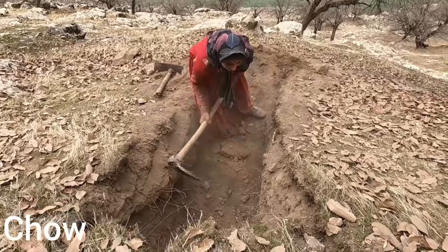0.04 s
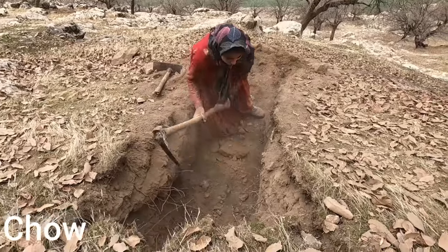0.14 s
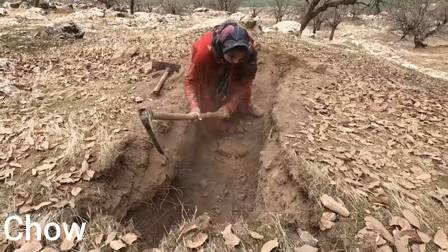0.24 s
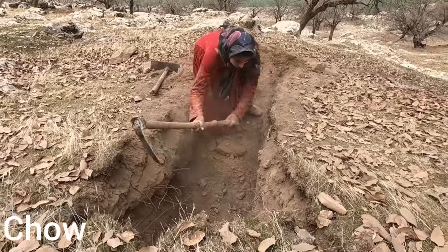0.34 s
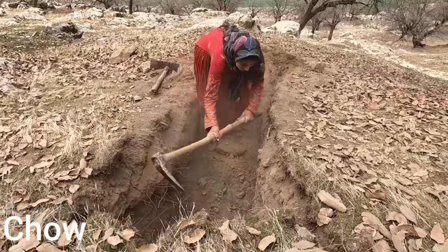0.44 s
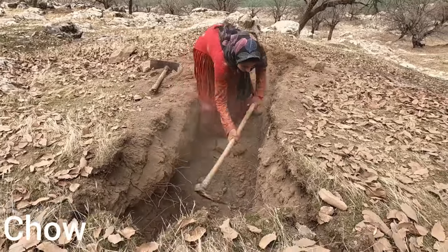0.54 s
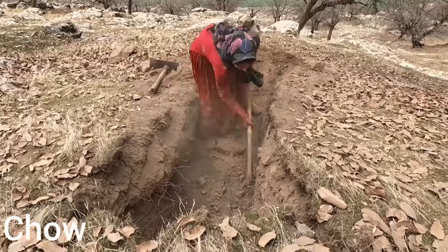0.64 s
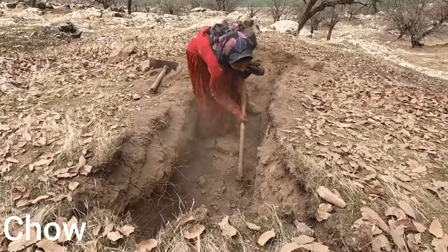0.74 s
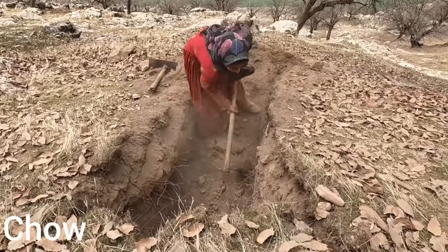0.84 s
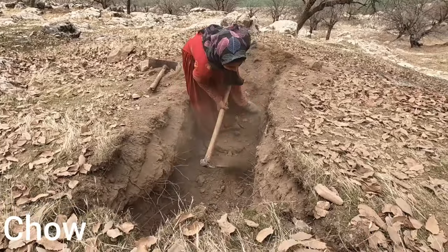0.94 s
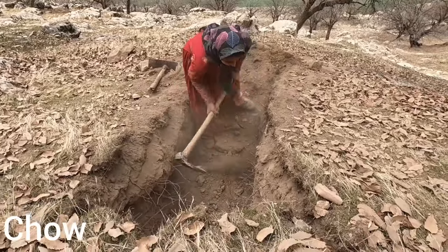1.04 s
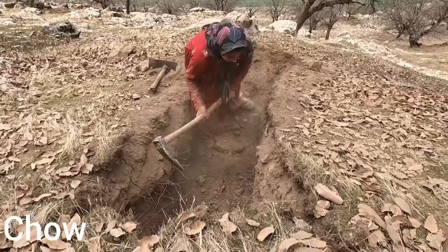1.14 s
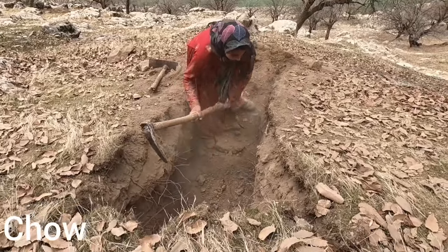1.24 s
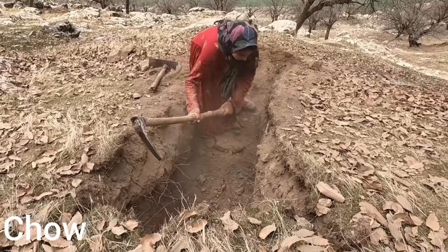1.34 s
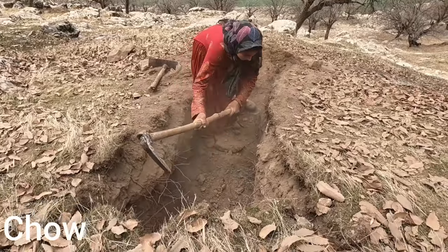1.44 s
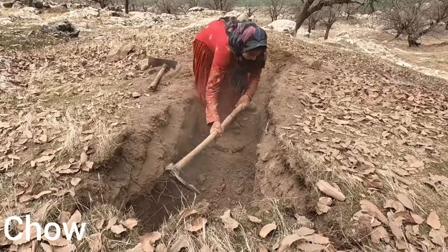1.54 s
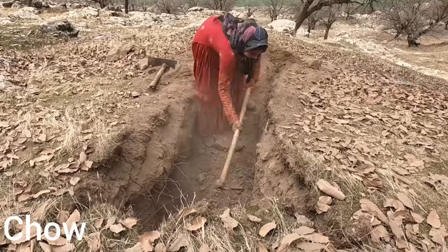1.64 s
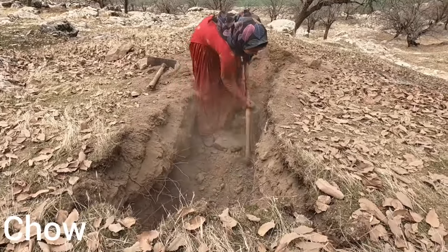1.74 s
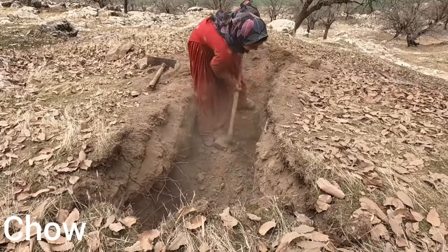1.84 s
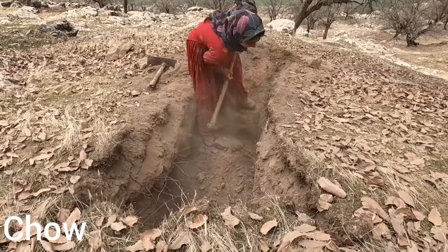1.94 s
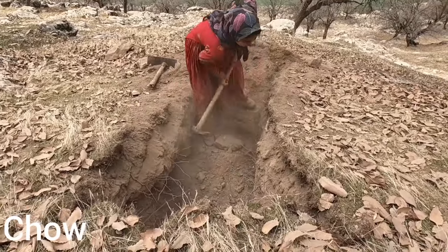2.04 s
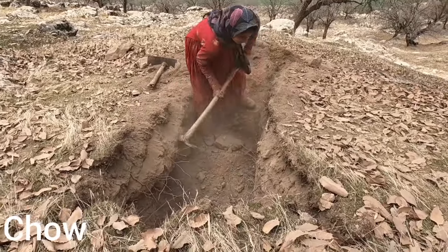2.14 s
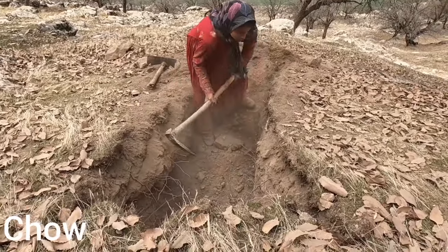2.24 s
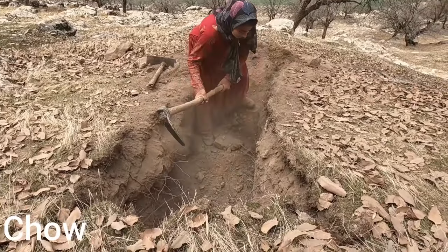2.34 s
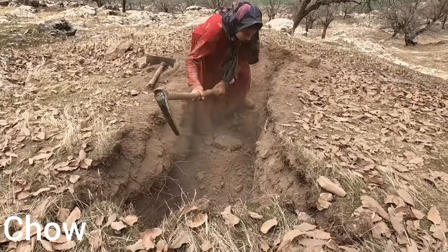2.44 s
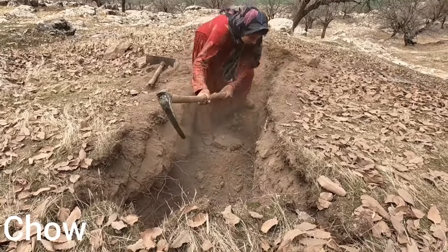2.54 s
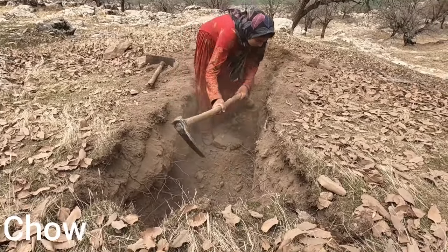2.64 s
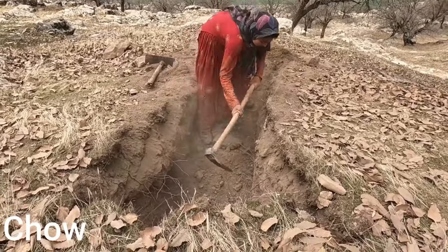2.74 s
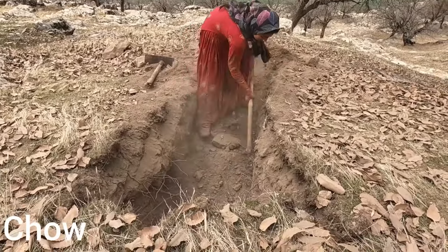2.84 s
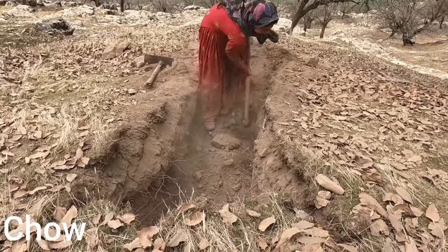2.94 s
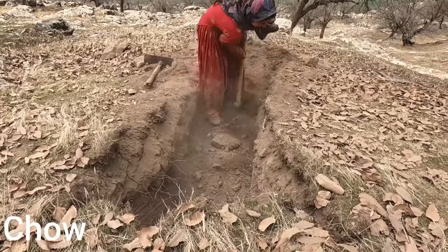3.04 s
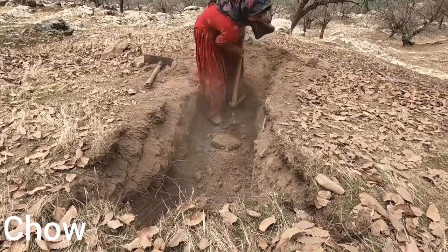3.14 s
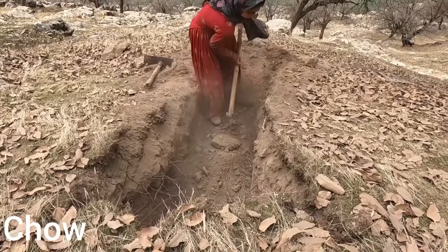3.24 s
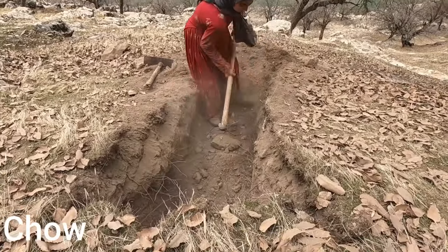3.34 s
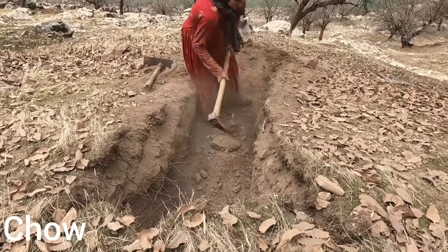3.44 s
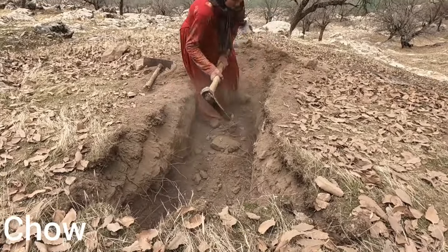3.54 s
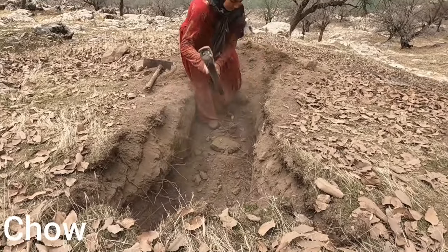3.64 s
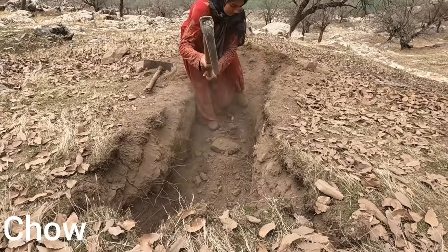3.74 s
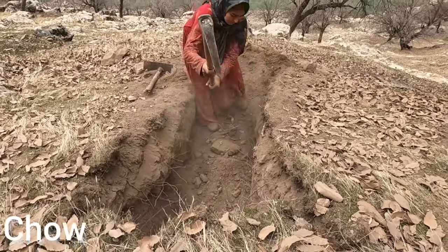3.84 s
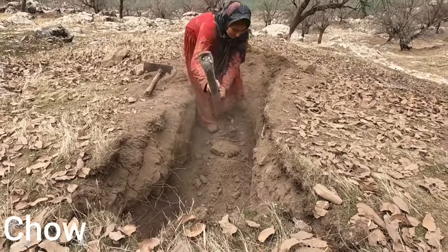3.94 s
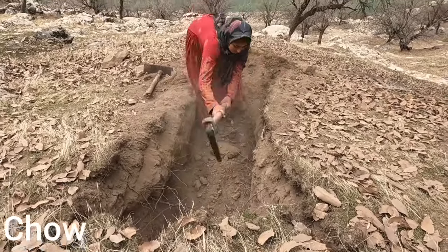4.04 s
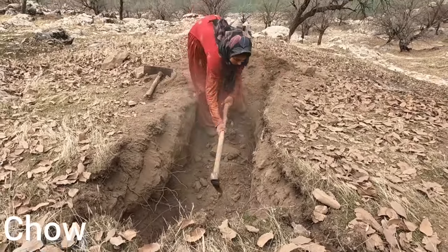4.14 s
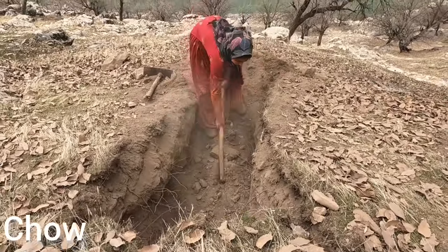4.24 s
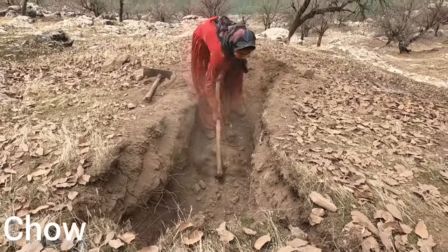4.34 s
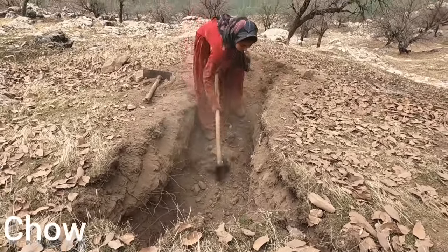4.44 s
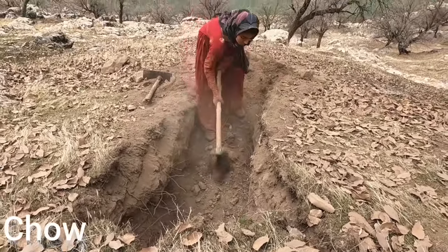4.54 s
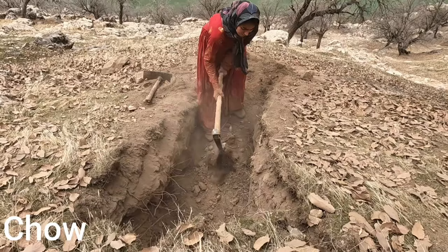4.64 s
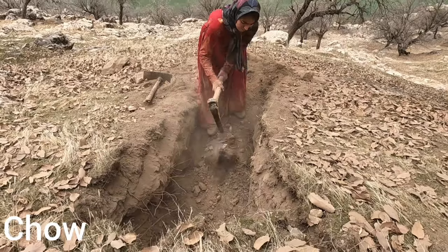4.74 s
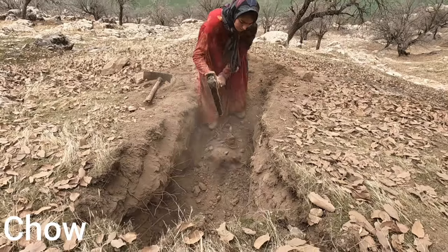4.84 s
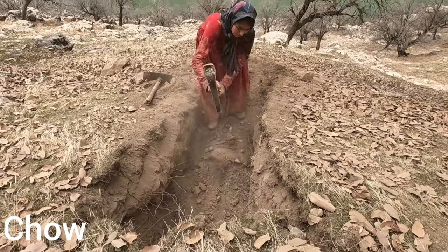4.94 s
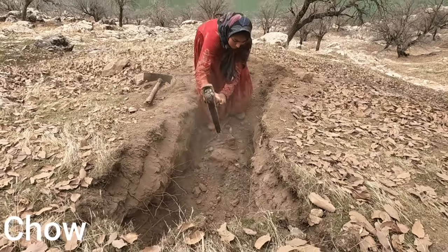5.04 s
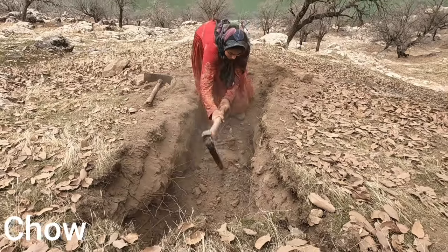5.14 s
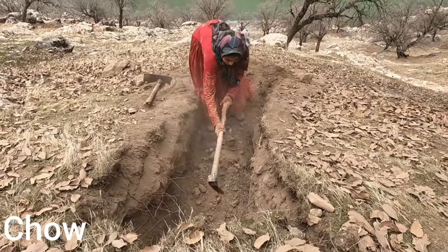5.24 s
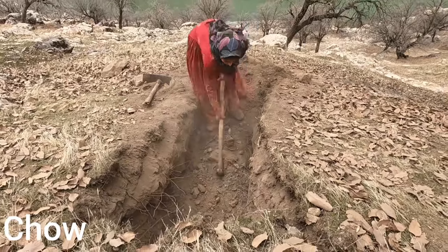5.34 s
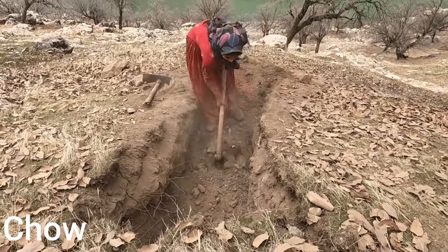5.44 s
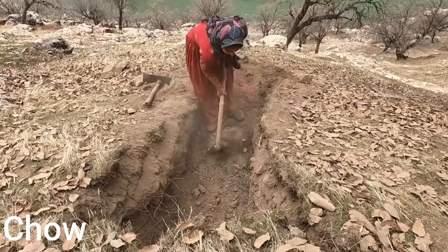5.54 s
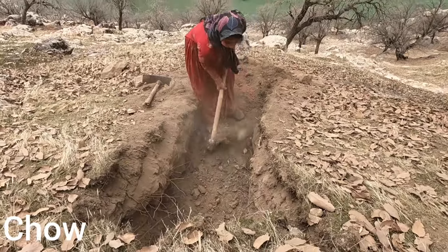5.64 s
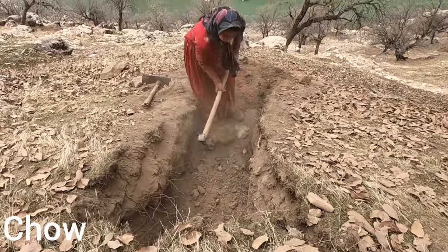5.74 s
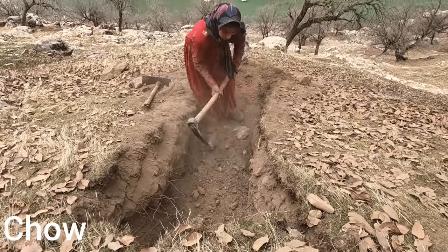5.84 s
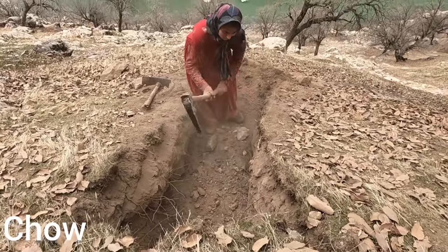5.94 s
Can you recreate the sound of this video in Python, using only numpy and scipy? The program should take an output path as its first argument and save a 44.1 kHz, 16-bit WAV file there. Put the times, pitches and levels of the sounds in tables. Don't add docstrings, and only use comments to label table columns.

```python
import sys
import numpy as np
from scipy import signal
from scipy.fft import rfft, irfft, next_fast_len
from scipy.io import wavfile
from scipy.ndimage import uniform_filter1d

SR = 44100
rng = np.random.default_rng(int(sys.argv[2]) if len(sys.argv) > 2 else 0)


def log_audio(samples):
    frames = np.atleast_2d(samples).T
    limited = np.clip(frames, -1, 1)
    pcm = np.round(limited * 32767).astype(np.int16)
    wavfile.write(sys.argv[1], SR, pcm)


def volts(x):
    e = np.asarray(x, float) / 20
    return 10 ** e


N = 264159


def evened(x):
    return x / np.sqrt(np.mean(x ** 2) + 1e-20)


def peak_one(x):
    return x / np.abs(x).max()


def read(points, hz):
    f, value = np.transpose(points)
    return np.interp(np.log(hz + 1), np.log(f + 1), value, left=value[0] - 30, right=value[-1] - 30)


def colour(x, points):
    hz = np.abs(np.fft.fftfreq(4096, 1 / SR))
    log_gain = np.log(volts(np.maximum(read(points, hz), -90)))
    taps = np.fft.ifft(np.exp(np.conj(signal.hilbert(log_gain)))).real[:2048]
    taps = taps.reshape((1,) * (x.ndim - 1) + (-1,))
    return signal.oaconvolve(x, taps, axes=-1)[..., :x.shape[-1]]


def ring(x, hz, width):
    pole = np.exp((2j * np.pi * hz - np.pi * width) / SR)
    return 2 * signal.lfilter([1 - abs(pole)], [1, -pole], x).real


def add(mix, s, sound):
    part = mix[round(s * SR):][:len(sound)]
    part += sound[:len(part)]


# frequency in Hz, level in dB per Hz.
AIR_SPECTRUM = [(15, -31), (25, 6), (64, -6), (108, -18), (185, 0.5), (818, -14), (1040, -5.5),
                (1400, -3.5), (3250, -27.5), (7710, -21.5), (16000, -62)]
# frequency in Hz, likeness from 0 to 1.
AIR_COHERENCE = [(60, 0.17), (240, 0.26), (950, 0.61), (3770, 0.8), (15000, 0.49)]


def air():
    size = next_fast_len(N, True)
    hz = np.fft.rfftfreq(size, 1 / SR)
    a, b = rfft(rng.standard_normal((2, size)))
    same = np.clip(np.interp(hz, *np.transpose(AIR_COHERENCE)), -1, 1)
    pair = np.array([a, same * a + np.sqrt(1 - same ** 2) * b]) * volts(read(AIR_SPECTRUM, hz))
    swell = uniform_filter1d(rng.standard_normal(N), size=5000)
    swell_db = 0.6 * evened(uniform_filter1d(swell, size=5000))
    return volts(-64 + swell_db) * evened(irfft(pair, size)[:, :N])


def lumps(points, apart):
    swell = volts(3.0 * evened(uniform_filter1d(rng.standard_normal(N), size=1500)))
    low = colour(swell * rng.standard_normal((3, N)), points)
    return evened(low[0] + apart * low[1:])


# time in seconds, level in dB.
QUAKES = [
    (.74, -46.5),
    (1.79, -33),
    (2.97, -36.5),
    (4.34, -39),
    (5.45, -35.5),
]


def quake(t, offset_db, db_per_s):
    total = 0
    for s, db in QUAKES:
        onset = np.clip(1 + (t - s) / 0.028, 0, 1)
        total = total + volts(db + offset_db - db_per_s * abs(t - s)) * onset
    return total


# frequency in Hz, level in dB per Hz.
BREEZE_SPECTRUM = [(18, 2), (70, 2.5), (110, -9), (160, -33)]
# time in seconds, level in dB.
GUSTS = [(0, -40), (.12, -49), (.66, -55), (1.0, -59), (1.45, -88), (1.73, -59.5), (1.95, -46),
         (2.1, -62.5), (2.6, -75.5), (3.18, -52.5), (3.35, -77.5), (3.8, -71), (4.1, -58), (4.5, -53),
         (4.72, -64), (5.35, -67.5), (5.73, -46), (5.99, -51)]


def breeze():
    t = np.arange(N) / SR
    strength = volts(np.interp(t, *np.transpose(GUSTS))) + quake(t, offset_db=1.5, db_per_s=194)
    return strength * lumps(BREEZE_SPECTRUM, apart=.06)


def thud(db, hz, fade_s, push):
    t = np.arange(12000) / SR
    swing = volts(-60 * (t / fade_s) ** 2) * np.sin(2 * np.pi * hz * t)
    clods = ring(rng.standard_normal(len(t)), 2.5 * hz, 1.38 * hz)
    clods = evened(ring(clods, 2.5 * hz, 1.38 * hz))
    onset = 1 - np.exp(-t * hz * 9)
    return push * volts(db) * onset * (swing + 0.13 * clods * volts(-60 * t / (3.3 * fade_s)))


# start in seconds, level in dB, frequency in Hz, fading time in seconds.
HEAVES = [
    (.15, -55, 170, .16),
    (.27, -52, 185, .16),
    (3.58, -58, 22, .12),
    (3.855, -50, 24, .12),
    (3.97, -48, 19, .15),
    (1.62, -57, 160, .2),
    (2.25, -56, 150, .15),
    (4.05, -56, 75, .2),
]


def heaves():
    low = np.zeros(N)
    for s, *swing in HEAVES:
        add(low, s, thud(*swing, 1))
    return low


def grains(per_s, spread_db, points, cycles, apart, count=8):
    clumps = volts(3.1 * evened(uniform_filter1d(rng.standard_normal(N), size=250)))
    shower = np.zeros((3, N))
    for k, hz in enumerate(np.geomspace(points[1][0], points[-2][0], count)):
        lands = rng.random(N) < per_s / count / SR
        size = volts(spread_db * np.minimum(rng.exponential(1, N), 4.0)) * lands
        u = np.arange(-2.5 * cycles, 3.4 * cycles, hz / SR)
        grain = np.exp(-(u / cycles) ** 2) * np.sin(2 * np.pi * u) * hz
        shower[k % 3] += signal.oaconvolve(size * clumps, grain)[:N]
    bed = .75 * rng.standard_normal((3, N)) * np.sqrt(clumps)
    shower = colour(evened(shower) + bed, points)
    return evened(shower.sum(0) + apart * (shower[1:] - shower[:0:-1]))


def slide(t, start, length):
    rise_s, stop_s, tail_db, tail_s = 0.037, 0.041, -16.5, 0.15
    after = np.maximum(t - start - length, 0)
    ending = np.exp(-after / stop_s) + volts(tail_db) * np.exp(-after / tail_s)
    return np.clip(1 + (t - start) / rise_s, 0, 1) ** 2 * ending


# frequency in Hz, level in dB per Hz.
GRIT_SPECTRUM = [(1180, 3.5), (2000, -5), (2320, -4.5), (3200, -5.5), (3980, -8), (6820, -6), (7840, -7.5),
                 (9660, -21.5), (16000, -32)]
CRUMB_SPECTRUM = [(160, -29), (280, -2), (365, 9), (587, -2.5), (840, 3), (1220, -0.5), (1520, 5.5),
                  (3150, -25.5), (3500, -37), (4550, -97.5), (7700, -120)]
RUMBLE_SPECTRUM = [(90, -13.5), (160, 4.5), (260, -7), (400, -20)]
# start in seconds, length in seconds, grit in dB, coarseness in dB.
SLIDES = [(0, 0.11, -59.5, -1.5), (0.199, 0.62, -78, -3), (0.756, 0.23, -60, -2), (1.027, 0.49, -63.5, -16),
          (1.765, 0.054, -46, -4.5), (1.888, .15, -56.5, -2.5), (2.109, 0.083, -60.5, -3),
          (2.877, 0.049, -57, 0), (3.0, 0.19, -55.5, 2.5), (4.32, 0.039, -57.5, 4), (4.45, .01, -60, -3),
          (4.5, 0.1, -56, -5), (4.72, 0.03, -63, -8), (4.8, .01, -59, -4), (4.865, 0.05, -56, -0.5),
          (4.97, .04, -57, -2), (3.58, .06, -80, -8), (3.72, .04, -81, -10), (4.05, .15, -80, 8),
          (1.22, .06, -64, -12), (1.99, .03, -58, -4), (5.083, .3, -77, -6.5), (5.462, 0.17, -59, 3.5),
          (5.7, .2, -55.5, 2.5)]


def trickle():
    t = np.arange(N) / SR
    flow = np.array([volts(db) * slide(t, s, length) for s, length, db, _ in SLIDES])
    coarse_db = np.transpose(SLIDES)[3]
    fine = volts(-80) + flow.sum(0)
    crumb = volts(-74) + volts(coarse_db - 4.5) @ flow
    low = volts(-71) + volts(1.32 * coarse_db - 1) @ flow + quake(t, offset_db=0, db_per_s=229)
    grit = fine * grains(per_s=3200, spread_db=3.1, points=GRIT_SPECTRUM, cycles=1.518, apart=0.45)
    crumbs = grains(per_s=1000, spread_db=2.8, points=CRUMB_SPECTRUM, cycles=1.108, apart=.2, count=5)
    crumbs = crumb * volts([[-.8], [.8]]) * crumbs
    return grit + crumbs + low * lumps(RUMBLE_SPECTRUM, apart=.06)


def pebble(db, hz, blunt):
    t = np.arange(600) / SR
    rock_s, rock = rng.uniform([.0003, .15], [.0015, .55]) / [1, blunt ** 3]
    touch_s = .005 / np.sqrt(hz)
    first = np.exp(-((t - .001) / touch_s) ** 2)
    second = rock * np.exp(-((t - .001 - rock_s) / touch_s) ** 2)
    snap = (1 + .8 * rng.standard_normal(len(t))) * (first + second)
    tone = ring(ring(snap, hz, .28 * blunt * hz), hz, .8 * blunt * hz)
    edge_hz = min(1.5 * hz + 400, 7500)
    edge = ring(ring(snap, edge_hz, .45 * blunt * edge_hz), edge_hz, .6 * blunt * edge_hz)
    dust = ring(rng.standard_normal(len(t)), hz, hz) * np.exp(-t / 0.0046) * np.minimum(t / 0.0016, 1)
    return volts(db) * peak_one(peak_one(tone) + 0.56 * peak_one(edge) + 0.16 * peak_one(dust))


def falling(table, blunt=1):
    ticks = np.zeros(N)
    for s, *stone in table:
        add(ticks, s, pebble(*stone, blunt))
    return signal.lfilter(*signal.butter(2, 375, "high", fs=SR), ticks)


# time in seconds, peak in dB, frequency in Hz.
LEAVES = [(0.068, -53, 2700), (0.1143, -38.5, 5800), (0.2236, -38, 7200), (0.9502, -59, 2050),
          (1.014, -35.5, 5050), (1.0896, -40, 2620), (1.1669, -28, 4800), (1.171, -23.5, 5200),
          (1.2148, -39, 2500), (1.2214, -23, 5750), (1.2494, -20, 5300), (1.2715, -30, 7200),
          (1.281, -33, 4800), (1.3813, -39, 5200), (1.4163, -36.5, 4330), (1.4447, -53, 5580),
          (1.485, -36, 5040), (1.5618, -40.5, 4900), (2.0847, -38, 6010), (2.4049, -23, 5000),
          (2.7578, -46, 2140), (4.1293, -38, 2760)]


def leaves():
    return falling(LEAVES)


# time in seconds, peak in dB, frequency in Hz.
SPECKS = [(.742, -36, 6500), (.793, -41, 6000), (.834, -43, 7000), (.888, -45, 6610), (.9497, -44, 5150),
          (1.0179, -46, 4820), (1.048, -47, 4520), (1.0824, -46, 3050), (1.150, -46, 6900),
          (1.3284, -49, 5170), (1.5024, -49, 7000), (1.5714, -55, 4030), (1.682, -51, 6670),
          (1.7453, -44, 7600), (1.7997, -29, 7000), (1.8385, -33, 7260), (1.9769, -42, 3950),
          (2.0979, -42, 7720), (2.1364, -46, 3110), (2.1544, -42, 3000), (2.1634, -44, 5000),
          (2.2354, -47, 5370), (2.3199, -48, 5800), (2.5112, -54, 7500), (2.6489, -55, 7330),
          (2.7566, -44, 7250), (3.023, -41, 3270), (3.0565, -45, 3090), (3.2864, -52, 3110),
          (3.3789, -53, 7400), (3.5882, -58, 7730), (3.6067, -57, 6790), (3.8129, -60, 6050),
          (3.8377, -58, 6550), (4.1295, -44, 7150), (4.5042, -39, 5960), (4.539, -42, 3320),
          (4.7177, -45, 6960), (4.8554, -44, 3880), (4.8614, -39, 3920), (4.9551, -41, 7130),
          (4.9604, -39, 3000), (4.9821, -39, 3390), (4.9874, -39, 6280), (5.0044, -45, 6760),
          (5.1208, -54, 7510), (5.1627, -52, 6710), (5.2041, -52, 5160), (5.232, -49, 7580),
          (5.3278, -45, 5300), (5.4615, -38, 3000), (5.5179, -46, 3240), (5.5932, -45, 3190),
          (5.6191, -44, 3000), (5.6521, -46, 3440), (5.7054, -38, 5000), (5.7124, -40, 7150),
          (5.7538, -41, 3030), (5.7905, -35, 7000)]


def specks():
    return volts(5) * falling(SPECKS)


# time in seconds, peak in dB, frequency in Hz.
PEBBLES = [(0.8094, -33, 5290), (0.8724, -30, 7750), (1.1124, -32, 4800), (1.8891, -28.5, 4860),
           (1.9335, -24, 5330), (1.9589, -29, 5430), (1.9934, -25.5, 6400), (2.0074, -24, 6100),
           (2.0154, -25.5, 4160), (2.0462, -30, 4730), (2.2094, -32, 7500), (2.2214, -30, 8550),
           (2.2613, -37, 6350), (3.0061, -27, 6400), (3.0734, -33, 3080), (3.0994, -29.5, 5120),
           (3.1572, -30, 8140), (3.1782, -31, 7600), (3.3209, -38, 5680), (3.3932, -42, 7440),
           (3.4346, -36, 8100), (4.4403, -32, 6820), (4.4842, -42, 5520), (4.7504, -32.5, 7100),
           (4.8319, -35, 6300), (5.3428, -31, 7540), (5.4989, -37, 3700), (2.174, -26, 5500),
           (5.911, -31.5, 3860), (5.948, -35.5, 4500)]
# time in seconds, peak in dB, frequency in Hz.
CLODS = [(0.828, -41, 2280), (2.1305, -25, 2320), (2.172, -28, 1110), (2.353, -45, 2600), (3.067, -34, 520),
         (3.118, -33.5, 900), (3.204, -34, 1770), (3.2046, -28, 2810), (4.518, -32.5, 1000),
         (4.8, -40, 2150), (4.91, -44, 1000), (4.9551, -54, 2240), (5.008, -32, 1090), (5.736, -31, 655),
         (5.7703, -29.5, 2970), (5.8074, -25, 2250)]
# time in seconds, peak in dB, frequency in Hz.
STONES = [
    (5.6815, -14.5, 2200),
    (5.6957, -16, 1500),
    (5.6995, -23, 1700),
    (5.7982, -7.5, 2900),
    (1.1039, -18.5, 2900),
]


def stones():
    return falling(PEBBLES) + falling(CLODS, blunt=1.26) + falling(STONES, blunt=1.26)


# start in seconds, level in dB, frequency in Hz, fading time in seconds.
THUDS = [(0.715, -13.5, 110, 0.029), (0.742, -23.5, 93.5, 0.03), (1.7665, -8.5, 181, 0.012),
         (1.777, -11.5, 72, 0.04), (1.7775, -13, 240, .021), (2.925, -21.5, 154, 0.027),
         (2.940, -9, 105, 0.03), (2.955, -19, 255, 0.038), (2.967, -24, 147, 0.066),
         (2.971, -28, 423, 0.046), (4.333, -22.5, 41, 0.1), (4.334, -28.5, 334, .03),
         (5.406, -16, 95, 0.0089), (5.417, -7, 79, 0.019), (5.456, -26, 47, 0.097),
         (5.79, -23.5, 253, 0.013)]
# start in seconds, level in dB, frequency in Hz, fading time in seconds.
REBOUNDS = [
    (0.85, -27, 170, 0.014),
    (1.8, -24.5, 101, .038),
    (2.878, -21, 170, 0.027),
    (4.305, -9.5, 69.4, 0.029),
    (4.319, -6.5, 71.6, 0.015),
    (5.4335, -19, 290, 0.02),
    (5.4342, -12, 135, 0.035),
]
# start in seconds, level in dB, frequency in Hz.
SLUMPS = [(.26, -35.5, 91), (0.509, -41.5, 48.4), (2.133, -37.5, 149), (2.175, -47, 147),
          (2.891, -26.5, 131), (3.07, -41.5, 108), (3.151, -40, 131), (4.45, -39, 121), (5.706, -29, 77),
          (5.737, -38, 207), (5.815, -29.5, 131)]


def earth():
    ground = np.zeros(N)
    for push, table in ((0.85, THUDS), (-1.12, REBOUNDS)):
        for s, *blow in table:
            add(ground, s, thud(*blow, push))
    for s, db, hz in SLUMPS:
        add(ground, s, thud(db, hz, 9.3 / hz, 0.86))
    return ground


# time in seconds, peak in dB, frequency in Hz.
CHIPS = [(.700, -24, 6500), (2.951, -12, 800), (4.2895, -9, 2500), (4.2895, -12, 8300), (4.3065, -16, 3500),
         (4.3225, -17, 8000), (4.3245, -22, 7500), (5.791, -24, 600), (5.7905, -32, 3500),
         (1.995, -33, 3100), (2.18, -36, 1300), (4.545, -42, 2000), (4.874, -36, 1300), (1.7675, -11, 2200),
         (1.7605, -15, 2100), (3.2046, -33, 7000), (5.432, -9, 2300), (.7105, -22, 8000)]


def chips():
    return falling(CHIPS, blunt=1.3)


# frequency in Hz, bandwidth in Hz, level in dB.
HEAD_MODES = [(1200, 150, 6), (1590, 77, -4), (1776, 390, 6), (2315, 220, -6), (3147, 230, -2),
              (3720, 210, 2), (5840, 140, 31), (6190, 63, -54.5), (6330, 160, 24.5), (7660, 100, -61)]


def contact(db, grind_ms, upper_db, hiss_db, rise_ms):
    t = np.arange(4000) / SR
    swell = 1 - np.exp(-(t / (0.00072 * max(rise_ms, .05))) ** 2)
    spray = np.exp(-t / (0.0005 * max(grind_ms, .5))) * swell
    breaks = spray * rng.standard_normal((3, len(t))) * volts(2.96 * rng.exponential(1, (3, len(t))))
    modes = []
    for hz, width, mode_db in HEAD_MODES:
        band = int(hz > 2700) + int(hz > 4500)
        modes.append(volts(mode_db) * ring(breaks[band], hz, width) / np.sqrt(width))
    low = peak_one(ring(sum(modes[:4]), 1300, 1500))
    low = low + .5 * peak_one(ring(ring(breaks[0], 1100, 1600), 1100, 1600))
    upper = peak_one(ring(sum(modes[4:6]), 3400, 1800))
    upper = upper + .5 * peak_one(ring(ring(breaks[1], 4030, 1800), 4030, 1800))
    hiss = 0.23 * peak_one(sum(modes[6:]))
    hiss = hiss + 2.37 * peak_one(ring(ring(breaks[2], 6900, 3500), 6900, 3500))
    return volts(db - 4) * low + volts(upper_db - 4) * upper + volts(hiss_db - 4) * hiss


def overtone(db, hz, t60):
    t = np.arange(6000) / SR
    rub = evened(ring(rng.standard_normal(len(t)), hz, .05 * hz))
    shiver = np.sin(2 * np.pi * hz * t) + .4 * rub
    return volts(db - 60 * t / t60) * (1 - np.exp(-t / .0007)) * shiver


# start in seconds, peak in dB, grind length in ms, upper ring in dB,
# stone hiss in dB.
CONTACTS = [(0.709, -17.5, 14.5, -32, -18.5), (0.7134, -16.5, 21.6, -25.5, -25.5),
            (0.7247, -19, 5, -36, -21), (0.844, -30, 20, -40, -41), (1.755, -14.5, 17, -23, -22),
            (1.7612, -18, 4.6, -11.5, -15), (1.769, -8.5, 11.6, -26, -39), (1.7741, -11.5, 3.8, -17, -18.5),
            (1.8332, -28.5, 4.2, -31.5, -25.5), (2.8703, -20.5, 5.9, -23, -23),
            (2.8725, -7, 1.9, -12, -30.5), (4.2803, -21.5, 7.4, -32, -22.5), (4.2898, -11.5, 7.7, -43, -15),
            (4.303, -20, 10, -30, -15.5), (4.3095, -12.5, 5.2, -18, -18.5), (4.321, -18, 19, -27, -35),
            (5.4022, -18, 4.7, -27.5, -32), (5.4185, -28, 16, -29, -20), (5.4277, -9.5, 5, -13, -16.5),
            (5.432, -6.5, 1.6, -15, -13)]
# start in seconds, peak in dB.
KNOCKS = [
    (0.8531, -22.5),
    (2.9512, -9),
    (2.9536, -7),
    (4.2967, -6.5),
    (5.4119, -10),
    (5.7898, -30),
]
# start in seconds, peak in dB.
DRAGS = [
    (0.6971, -23.5),
    (0.7692, -41),
    (0.882, -34),
    (1.7987, -29),
    (2.8943, -28.5),
    (2.9065, -30),
    (2.919, -30.5),
    (2.934, -27),
    (2.9728, -27),
    (4.865, -39),
]
# start in seconds, level in dB, frequency in Hz.
RINGS = [(1.762, -15, 1214), (1.764, -13, 3800), (1.995, -36, 6630), (1.767, -16.5, 6700),
         (2.871, -20, 6530), (2.871, -10.5, 1853), (2.872, -12, 3670), (2.872, -18, 1340),
         (2.951, -19, 6560), (2.952, -18, 3096), (2.953, -13, 1180), (4.2903, -11, 1590),
         (4.291, -17, 1945), (4.291, -17.5, 3060), (4.31, -13.5, 3060), (5.402, -18, 6740),
         (5.411, -17, 1844), (5.432, -12.5, 2306), (5.432, -14.5, 1770)]
# frequency in Hz, level in dB.
TAP = [(1260, -24.5), (1830, -30), (2440, -33), (3200, -37), (3800, -32)]
# frequency in Hz, level in dB, 60 dB decay in seconds.
GLANCE = [(1314, -38, 0.22), (1836, -30.5, 0.2), (2369, -44, .2), (3144, -41, 0.25), (3780, -39, .25)]


def steel():
    pick = np.zeros(N)
    for s, *bite in CONTACTS:
        add(pick, s, contact(*bite, rise_ms=2.17))
    for s, db in KNOCKS:
        add(pick, s, contact(db, grind_ms=4.5, upper_db=db - 24, hiss_db=db - 31, rise_ms=.6))
    for s, db in DRAGS:
        add(pick, s, contact(db, grind_ms=16, upper_db=db - 11, hiss_db=db - 13, rise_ms=1.4))
    for s, db, hz in RINGS:
        t60 = 0.048 * (1000 / hz) ** 0.43
        add(pick, s, overtone(db, hz, t60))
    for hz, db in TAP:
        add(pick, .844, overtone(db, hz, t60=0.055))
    for hz, db, t60 in GLANCE:
        add(pick, 2.888, overtone(db, hz, t60))
    return pick


def trench(x):
    t = np.arange(2600) / SR
    sparse = rng.standard_normal((2, len(t))) * (rng.random((2, len(t))) < .08)
    taps = sparse * volts(-60 * t / 0.085) * (t > .0015)
    taps = signal.lfilter([1], [1, -.62], taps)
    return signal.fftconvolve(x, taps / np.linalg.norm(taps[0]), axes=1)[:, :N]


# frequency in Hz, left minus right in dB.
PORTS = [(30, 3.5), (250, 4.5), (600, 2), (2500, 0.9), (5000, 1), (9000, 5), (16000, 3.7)]


def ports(x, lean_db, lag_s):
    size = next_fast_len(N, True)
    hz = np.fft.rfftfreq(size, 1 / SR)
    tilt = volts((read(PORTS, np.clip(hz, 31, 15900)) + lean_db) / 2)
    left = tilt * np.exp(-2j * np.pi * hz * lag_s)
    return irfft(rfft(x, size) * np.array([left, 1 / tilt]), size)[:, :N]


# frequency in Hz, gain in dB.
MICROPHONE = [(20, -10.5), (100, 15), (600, -1.5), (1200, -4.5), (7500, -1.5), (9500, -9.5), (16000, -18)]


def scene():
    soil = earth() * volts([[-.2], [.2]]) + trickle() + breeze() + air()
    ticks = ports(steel() + stones(), lean_db=-3.5, lag_s=1.4e-5)
    ticks = ticks + ports(leaves(), lean_db=1.0, lag_s=-0.000021)
    mix = ticks + volts(-18) * trench(ticks)
    mix = mix + ports(specks() + chips(), lean_db=-3, lag_s=1.4e-5)
    return colour(mix, MICROPHONE) + soil + heaves()


def low_pass(x):
    return signal.sosfilt(signal.butter(12, 16480, fs=SR, output="sos"), x)


def record(dry):
    limited = signal.oaconvolve(dry, signal.firwin(255, 16400, fs=SR)[None], "same")
    return low_pass(limited)


dry = scene()
out = record(dry)
log_audio(out)
```